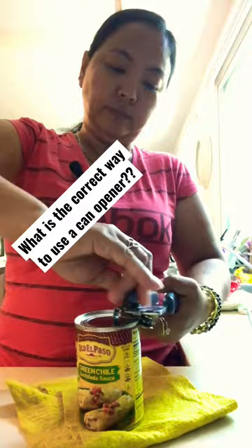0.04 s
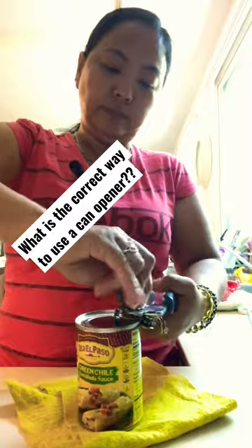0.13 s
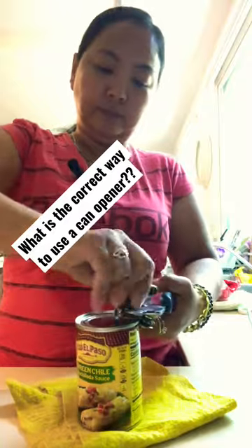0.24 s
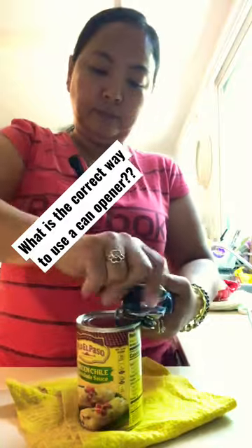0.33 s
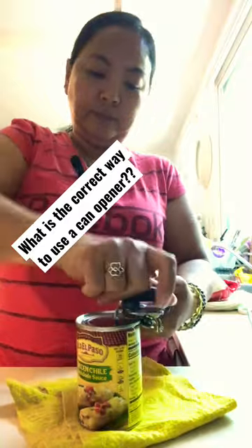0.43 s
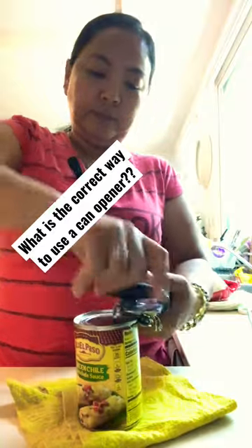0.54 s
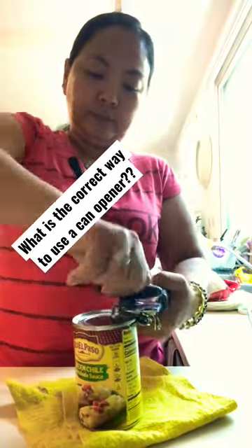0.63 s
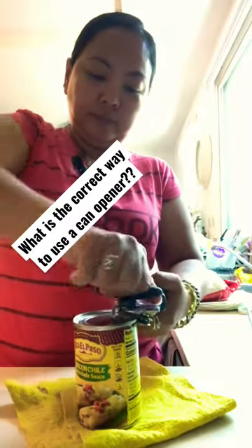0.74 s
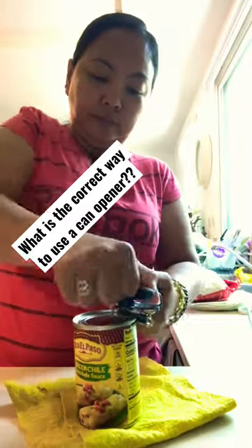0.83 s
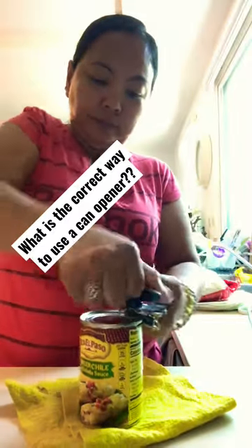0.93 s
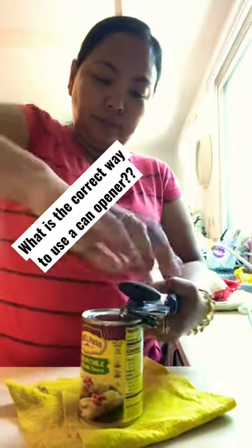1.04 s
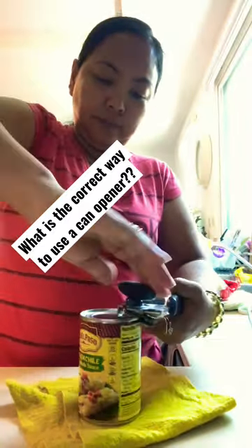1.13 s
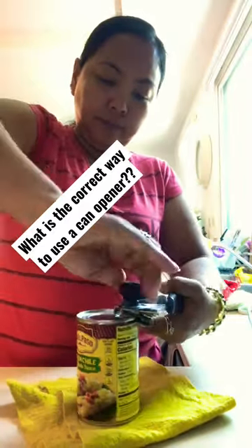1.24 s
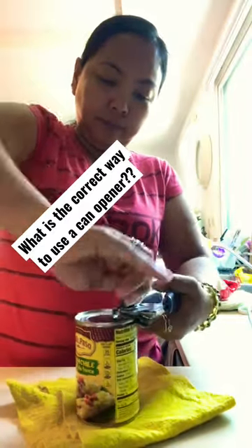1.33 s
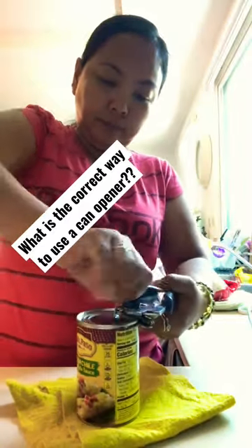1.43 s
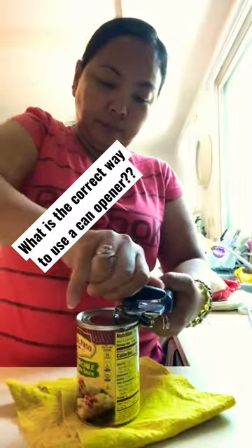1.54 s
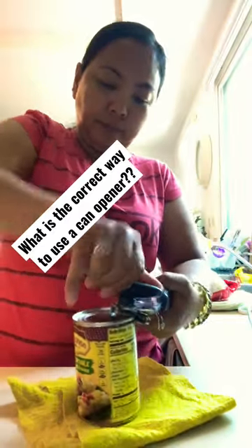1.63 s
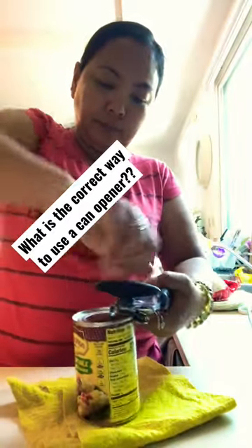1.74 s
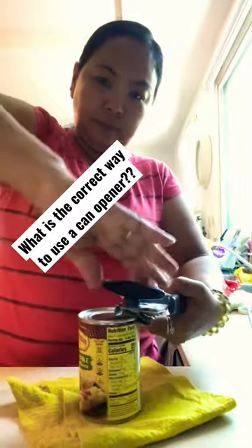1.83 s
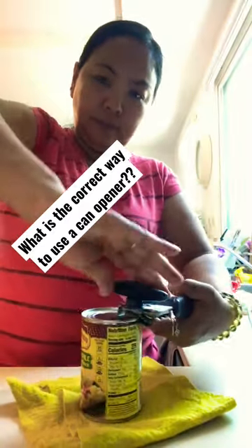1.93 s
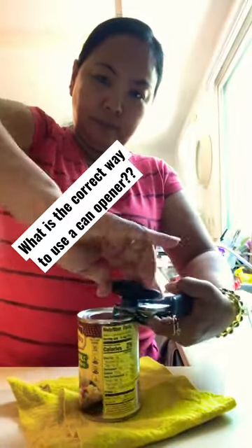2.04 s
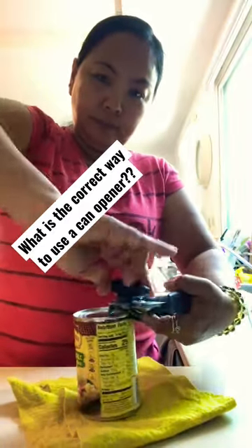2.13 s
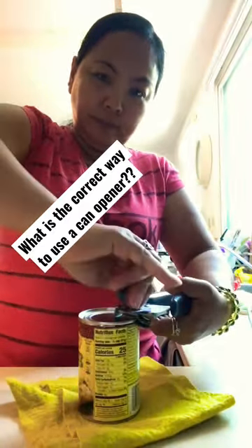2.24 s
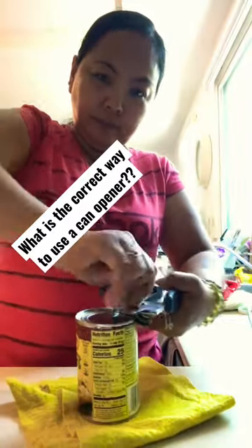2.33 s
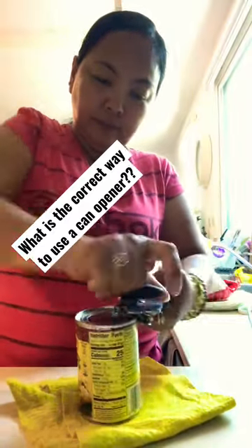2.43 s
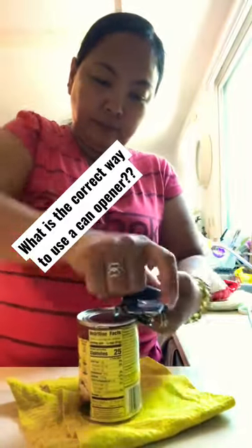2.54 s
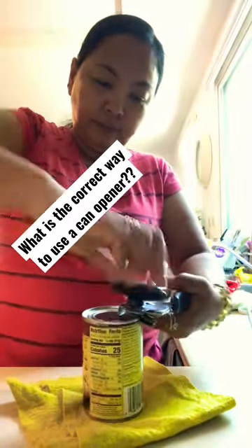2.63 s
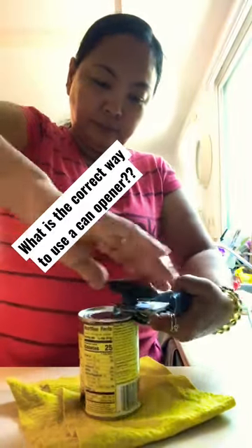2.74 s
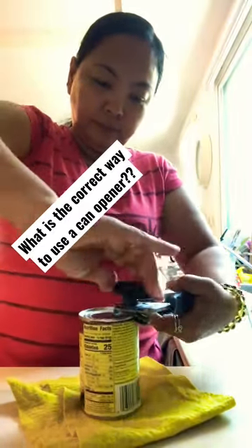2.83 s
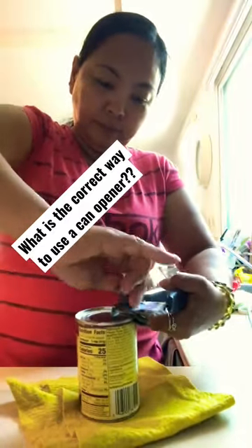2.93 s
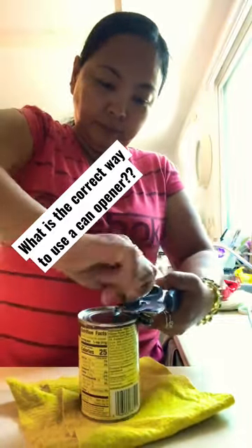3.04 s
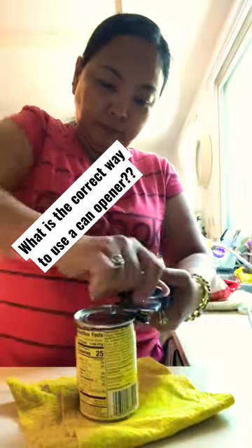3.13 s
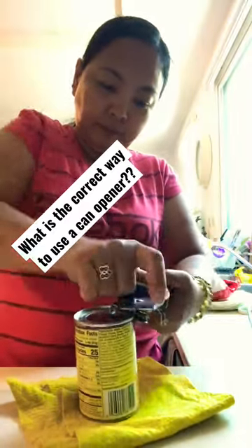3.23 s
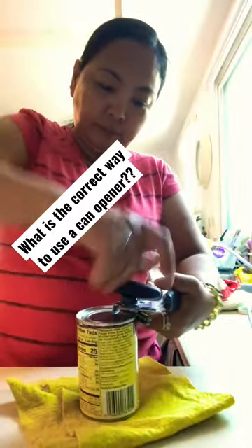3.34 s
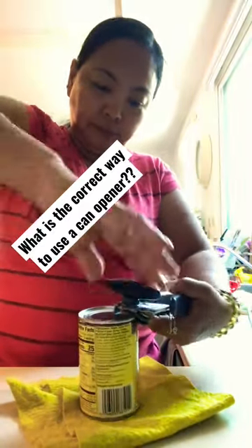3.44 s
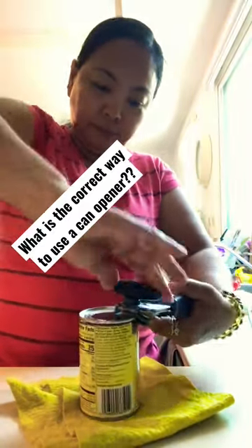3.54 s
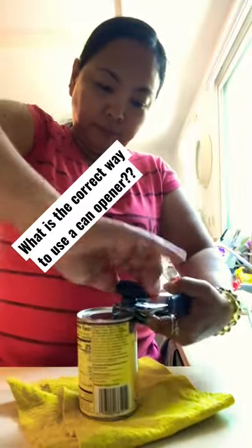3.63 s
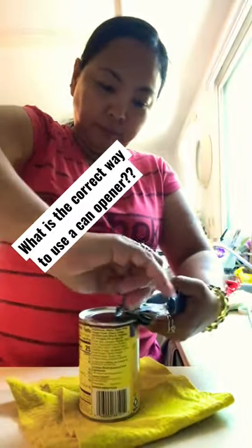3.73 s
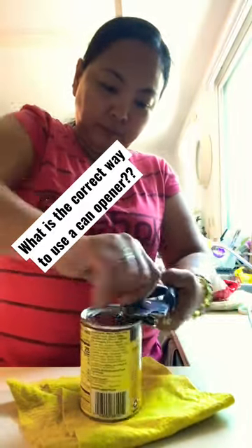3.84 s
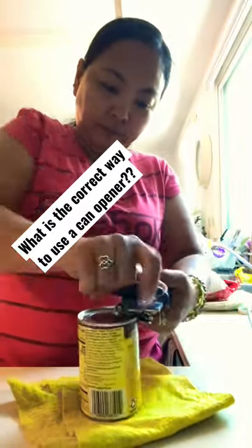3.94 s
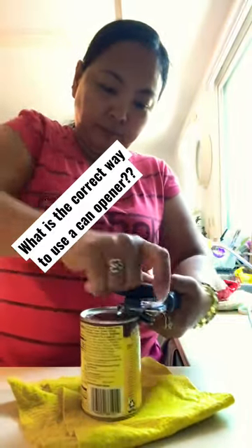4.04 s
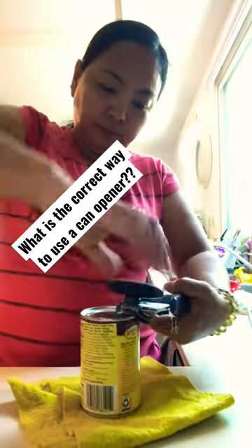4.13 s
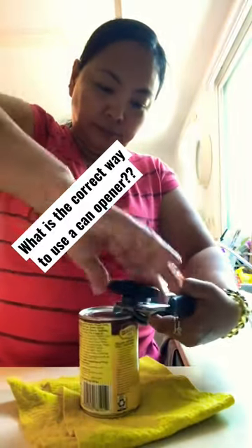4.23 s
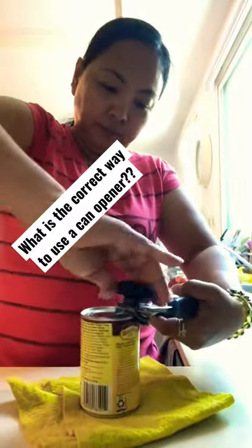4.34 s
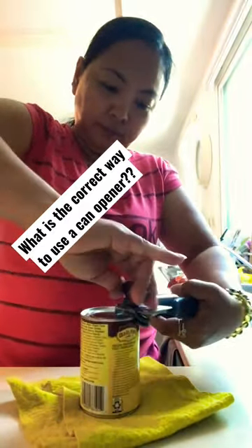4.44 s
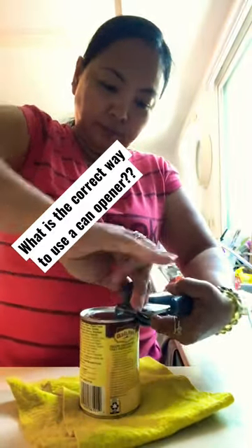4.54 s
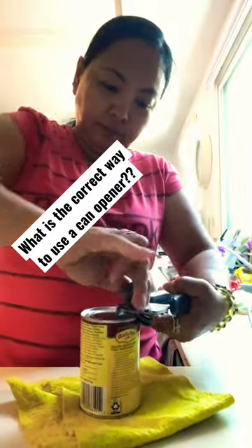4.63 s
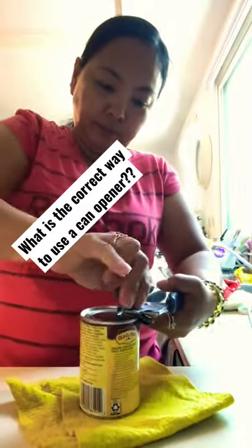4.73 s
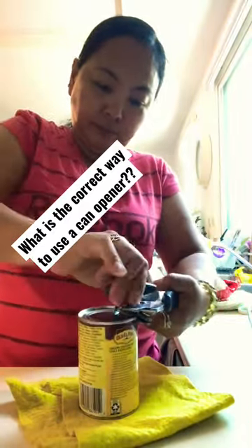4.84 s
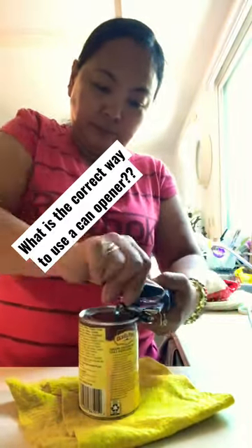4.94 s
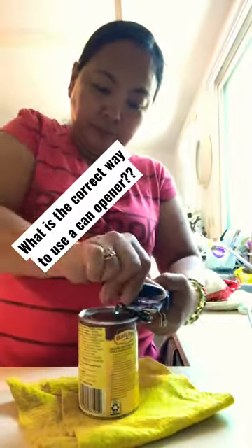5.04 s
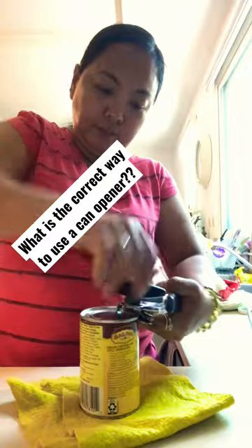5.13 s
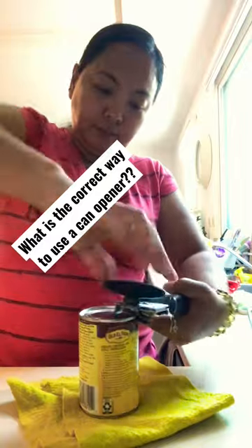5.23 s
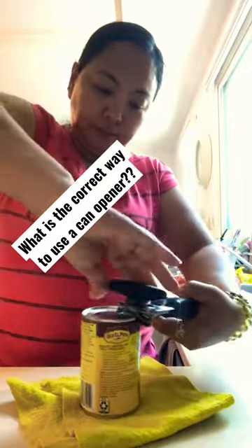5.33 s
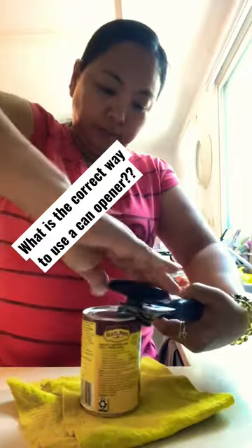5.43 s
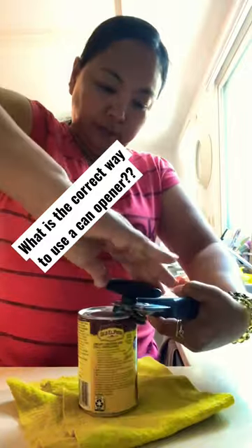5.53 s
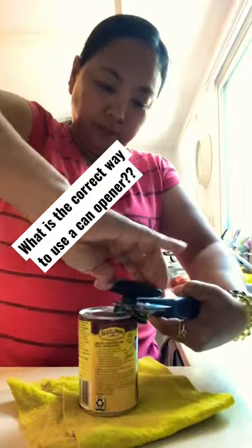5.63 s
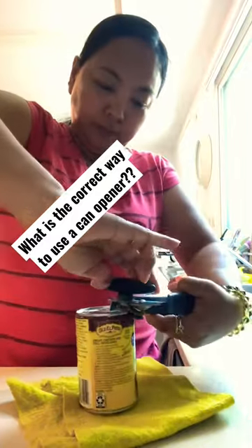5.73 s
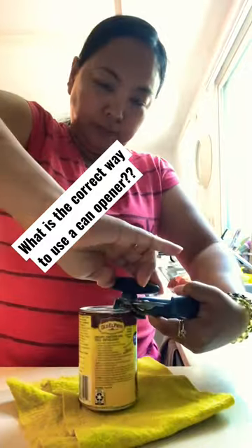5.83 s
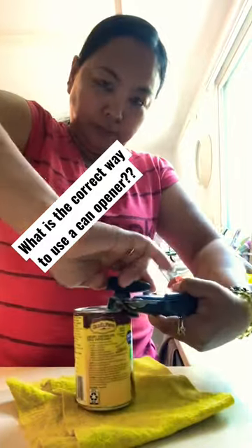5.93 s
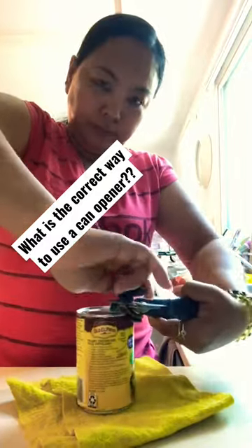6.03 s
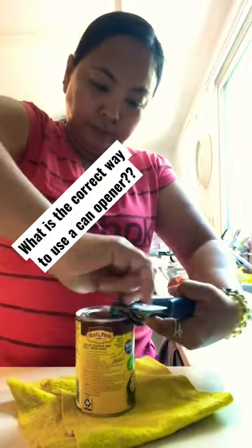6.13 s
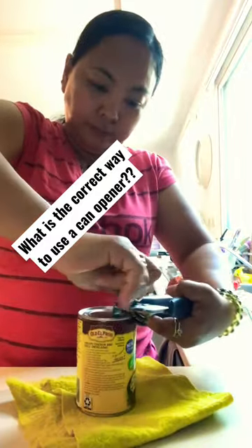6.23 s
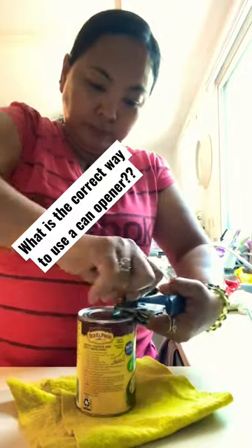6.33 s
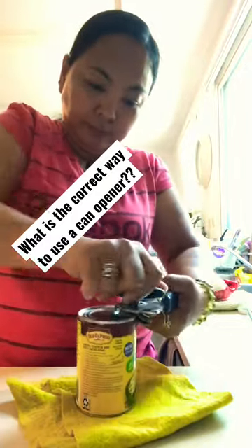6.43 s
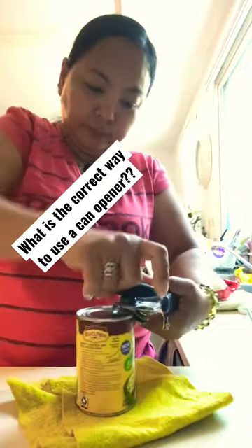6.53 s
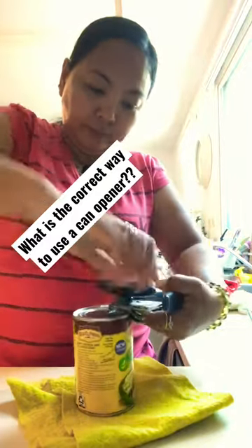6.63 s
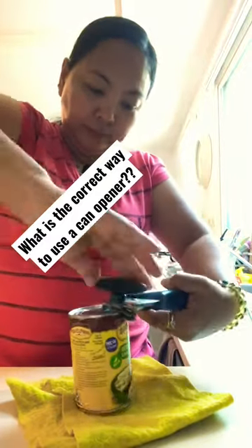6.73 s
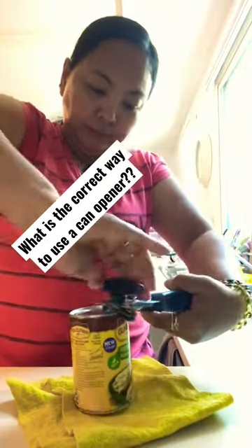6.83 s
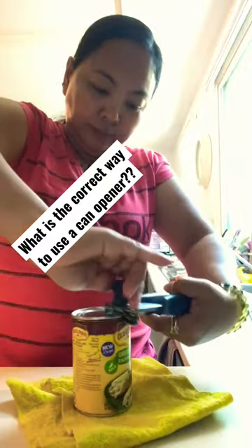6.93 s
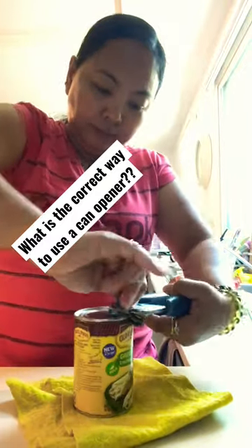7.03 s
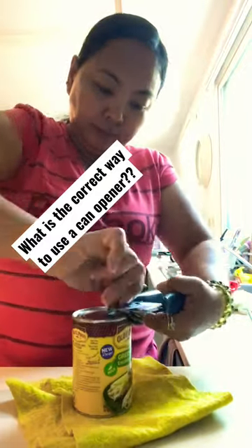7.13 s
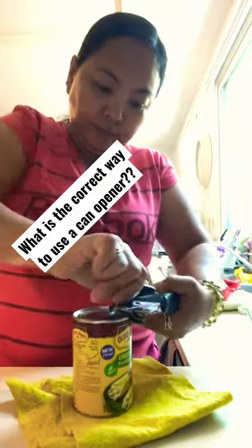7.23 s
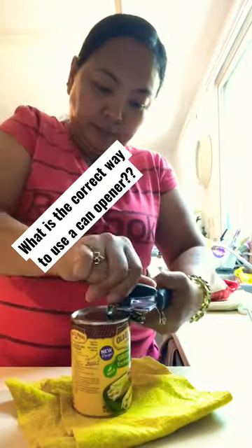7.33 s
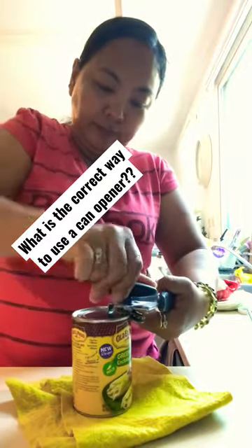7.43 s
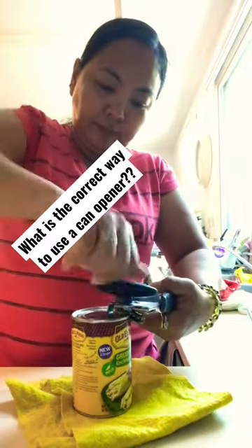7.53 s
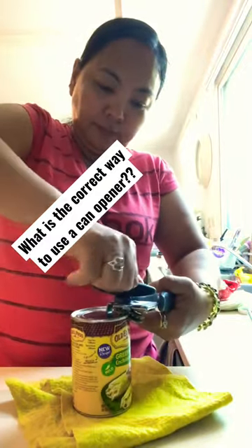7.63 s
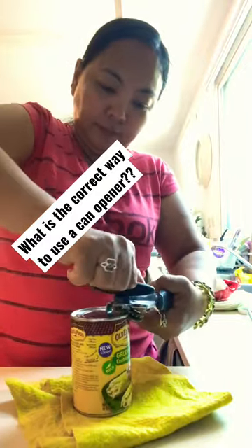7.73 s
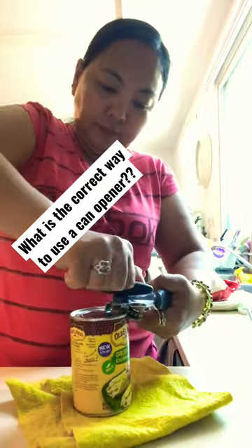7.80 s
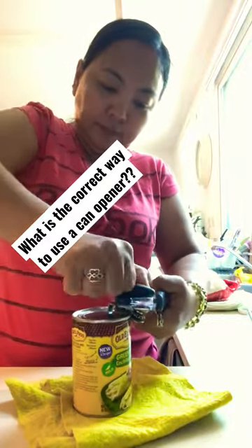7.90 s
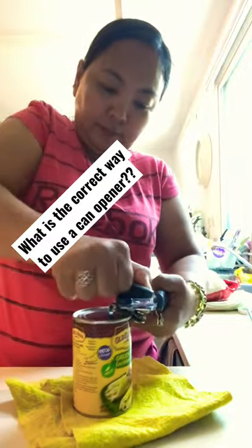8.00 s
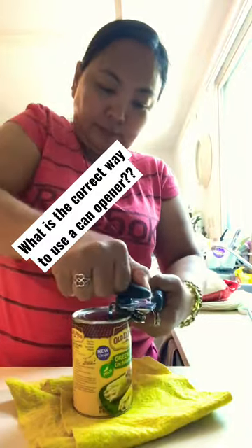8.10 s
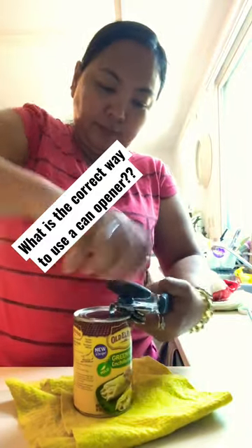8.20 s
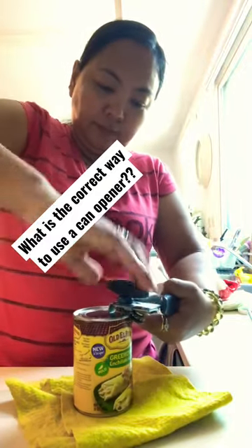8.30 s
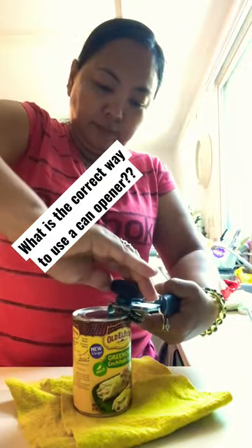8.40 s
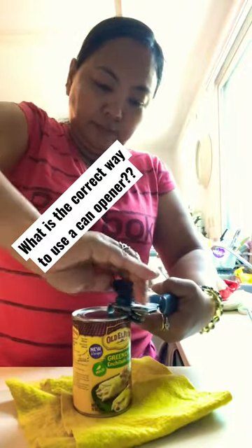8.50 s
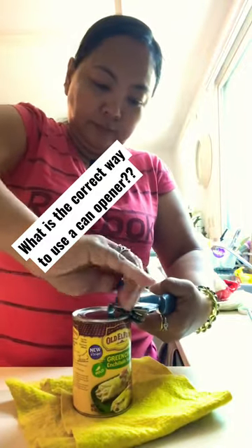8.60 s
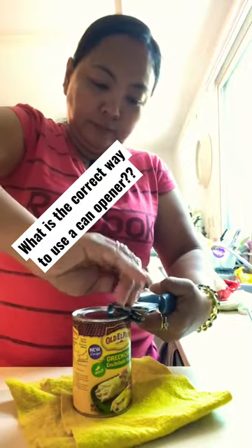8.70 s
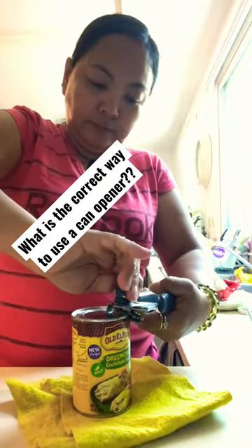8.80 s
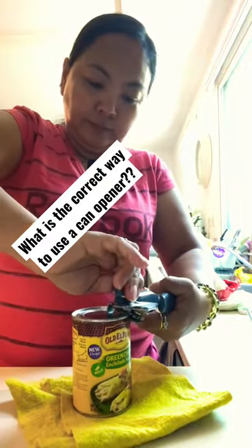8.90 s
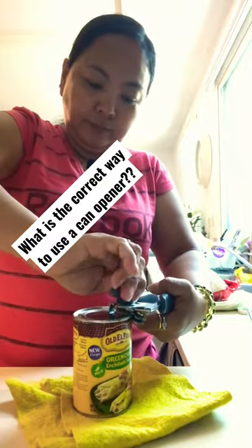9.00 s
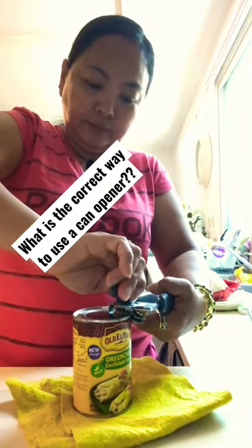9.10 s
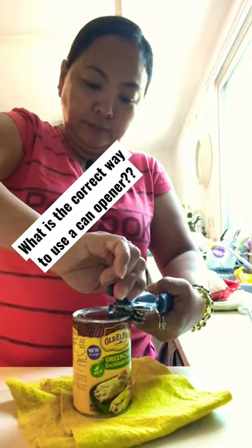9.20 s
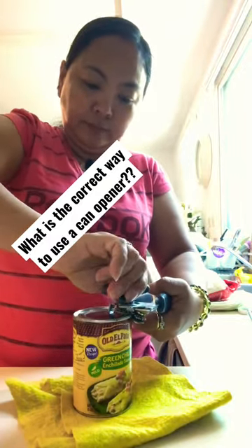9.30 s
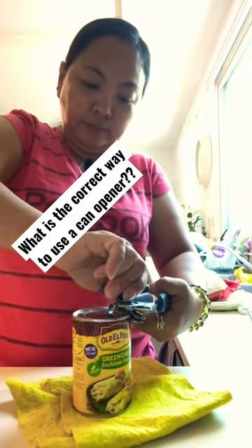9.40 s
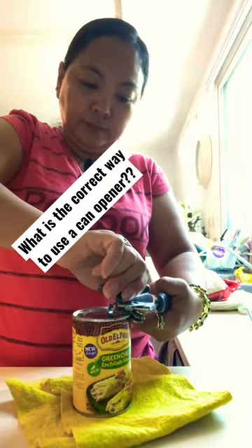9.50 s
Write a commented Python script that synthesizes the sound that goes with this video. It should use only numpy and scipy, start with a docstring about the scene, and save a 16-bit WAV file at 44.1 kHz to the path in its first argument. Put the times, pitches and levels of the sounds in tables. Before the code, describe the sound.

Clusters of metallic clicks, cracks and short scrapes come from a manual can opener working through a tin lid in a small kitchen.

```python
"""An appliance hums in a small kitchen as a hand can opener starts round a tin can. In each twist of the
key the wheel sticks and slips through the lid: lid, wall and steel jaws ring, and the can thumps on its
cloth. Just before 1 s a shirt brushes the microphone. The twists then come about every 0.75 s, and after
3 s the lid loosens. Past 5 s the hand takes a new grip: loose steel pings and the handle knocks.
The cutting starts again at 6 s and fades out around 9 s."""
import sys
import numpy as np
from scipy import signal
from scipy.fft import rfft, irfft, next_fast_len
from scipy.io import wavfile
from scipy.ndimage import uniform_filter1d

SR = 44100
rng = np.random.default_rng(int(sys.argv[2]) if len(sys.argv) > 2 else 0)


def wav_record(signal):
    """Record a signal, one row per channel, as 16-bit PCM in the file named by sys.argv[1]."""
    frames = np.transpose(np.atleast_2d(signal))
    bounded = np.clip(frames, -1, 1)
    # unit amplitude maps onto the largest positive 16-bit level
    quanta = np.round(bounded * 32767).astype(np.int16)
    wavfile.write(sys.argv[1], SR, quanta)


N = 421596
RING_TIME = np.arange(SR // 5) / SR   # the seconds over which one hit rings out
ATTACK = int(.012 * SR)   # the opening samples of a hit, which set its level
LID_LOOSENS_S = (3.2, 3.48)   # between these times the lid goes from stiff to half free
TOP_HZ = 10800   # the treble ends here; only two brief hisses go higher

# The lid's modes, the notes it rings at. A wider mode dies sooner.
# Each row: pitch in Hz, width in Hz, level in dB with the lid stiff, level in dB with it half free.
LID_MODES = [(1146.6, 41, -7, 0), (1265, 100, 3.5, 2.5), (1398, 17, -1, -11.5), (1584, 64, -2, -7.5),
             (1678, 7, -12, -11), (1810.8, 60, -17.5, 0), (1940, 72, -11.5, -5.5), (2177, 34, 1, -13)]
# The modes of the dragging blade. Each row: pitch in Hz, width in Hz, level in dB.
BLADE_MODES = [(2900, 600, 2), (4507, 540, 0), (5900, 792, -4.5), (8500, 1500, -26)]


def from_db(db):
    """Turn decibels into a number to multiply by."""
    return 10 ** (np.asarray(db) / 20)


def rms_one(x):
    """Scale a sound so that its average level (rms) is 1."""
    return x / np.sqrt(np.mean(x ** 2) + 1e-20)


def at_hz(points, hz):
    """Read between the rows of a table, with every octave equally wide."""
    row_hz, value = np.transpose(points)
    return np.interp(np.log(hz + 0.00069), np.log(row_hz), value)


def add(track, s, sound):
    """Mix a sound into the track, starting at s seconds."""
    start = max(round(s * SR), 0)
    part = sound[:max(N - start, 0)]
    track[start:start + len(part)] += part


def butter(x, hz, kind, order=2):
    """Keep the lows, the highs or a band; a higher order cuts more steeply."""
    return signal.sosfilt(signal.butter(order, hz, kind, fs=SR, output="sos"), x)


def noise(spectrum):
    """Steady noise at level 1, shaped by rows of frequency in Hz and level in dB."""
    size = next_fast_len(N)
    colour = from_db(at_hz(spectrum, np.arange(size // 2 + 1) * SR / size))
    return rms_one(irfft(rfft(rng.standard_normal(size)) * colour, size)[:N])


def contact(seconds, grit, spread_db, rise=0.079, snap_s=0.0072):
    """The force of one slip or hit: a shower of tiny slips. The shorter it is, the more it snaps."""
    seconds = max(seconds, 1e-4)
    grains, sizes = rng.standard_normal((2, len(RING_TIME)))
    envelope = np.exp(-RING_TIME / seconds) * (1 - np.exp(-RING_TIME / (rise * seconds)))
    force = grains * from_db(spread_db * sizes) * envelope
    force *= grit / np.sqrt(np.sum(force ** 2))
    force[0] += np.exp(-seconds / snap_s)
    return force + 1e-18


def friction(seconds, spread_db=5, catches_per_s=260, catch_db=4):
    """The force of a drag: uneven grains that bunch up where the surface catches."""
    t = np.arange(int(seconds * SR)) / SR
    grains, sizes, catches = rng.standard_normal((3, len(RING_TIME)))
    bunching = np.interp(t * catches_per_s, np.arange(len(catches)), catches)
    strength = from_db(spread_db * sizes[:len(t)] + catch_db * bunching)
    force = rms_one(grains[:len(t)] * strength * signal.windows.tukey(len(t)))
    return np.pad(force, (0, ATTACK)) + 1e-18


def body(force, modes, scatter_db=0, detune=0, damping=1):
    """A force rings an object's modes. Scatter and detune vary their levels and pitches at each touch."""
    out = 0
    for hz, width, db in modes:
        strength, shift = rng.standard_normal(2)
        decay = np.exp(-np.pi * width * damping / SR)
        angle = 2 * np.pi * hz * (1 + detune * shift) / SR
        ring = signal.lfilter([1, 0, -1], [1, -2 * decay * np.cos(angle), decay * decay], force)
        out = out + rng.choice([-1, 1]) * from_db(db + scatter_db * strength) * rms_one(ring)
    return out / np.sqrt(np.mean(out[:ATTACK] ** 2) + 1e-20)


def modes_at(table, s):
    """The modes at s seconds: as the lid loosens, some modes ring more and others less."""
    hz, width, stiff_db, free_db = np.transpose(table)
    freed = np.interp(s, LID_LOOSENS_S, [0, 1])
    return list(zip(hz, width, stiff_db + freed * (free_db - stiff_db)))


def air(level_db=-56):
    """The air of the room: a faint, low, steady rush."""
    # The tone of the air. Each row: frequency in Hz, relative level in dB.
    spectrum = [(30, -9), (60, 10), (110, -13.5), (160, -9), (280, -11), (450, -10), (700, -14),
                (1400, -16.5), (2100, -25.5), (3000, -28), (3800, -39), (6000, -39.5), (10000, -45.5),
                (16000, -54.5)]
    return from_db(level_db) * noise(spectrum)


def hum(waver_hz=.7):
    """An appliance motor hums a few slightly wavering tones."""
    # The motor's tones. Each row: pitch in Hz, level in dB.
    tones = [(150.4, -65.5), (299.5, -70), (528, -75), (753, -74.5)]
    out = 0
    for hz, db in tones:
        waver = waver_hz * noise([(1, -2.0), (4, -4.5), (12, -29.5), (50, -100)])
        out = out + from_db(db) * np.sqrt(2) * np.sin(2 * np.pi * np.cumsum(hz + waver) / SR)
    return out


def kitchen(x, first_s=0.0027, build_s=0.0013):
    """Echoes off the near walls thicken into a short tail that dies away band by band."""
    # How long the room rings. Each row: frequency in Hz, seconds to fade by 60 dB (0.15 at least is used).
    fade_times = [(150, 0.55), (500, 0.14), (1000, 0.36), (1750, 0.48), (3000, 0.3), (4500, 0.36),
                  (10000, 0.14)]
    # How strong its echo is. Each row: frequency in Hz, level in dB.
    echo_levels = [(150, 0), (500, -5), (1000, -13.5), (1750, -11), (4000, -15.5), (10000, -11)]
    t, echo = np.arange(SR * 3 // 4) / SR, 0
    build_up = 1 - np.exp(-np.maximum(t - first_s, 0) / build_s)
    edges_hz = np.geomspace(90, 14000, 11)
    for low, high in zip(edges_hz, edges_hz[1:]):
        hz = np.sqrt(low * high)
        fade_s = max(at_hz(fade_times, hz), .15)
        shape = build_up * np.exp(-np.log(1000) * t / fade_s)
        band = butter(rng.standard_normal(len(t)), [low, high], "band")
        echo = echo + from_db(at_hz(echo_levels, hz)) * band * shape / np.sqrt(np.sum(shape ** 2))
    return signal.fftconvolve(x, echo)[:N]


def swell(peak_s, peak_db, rise_db_per_s, fall_db_per_s):
    """The loudness of a stroke that grows to a peak and fades."""
    t = np.arange(N) / SR
    below_db = np.maximum(rise_db_per_s * (peak_s - t), fall_db_per_s * (t - peak_s))
    return from_db(peak_db - np.minimum(below_db, 200))


def shirt(relax_hz=850, pull_s=0.0015, pull_share=0.077):
    """A shirt rubs over the microphone and snags: a short pull, then a snap the other way."""
    # The cloth rubs. Each row: start in seconds, length in seconds, level in dB.
    rubs = [(0.748, 0.05, -62.5), (0.793, 0.0397, -46.5), (0.835, 0.01, -35)]
    # The cloth snags and lets go. Each row: time in seconds, strength in dB.
    snags = [(0.847, -3.5), (0.8676, -9), (0.8708, -4.5), (0.873, -8), (0.879, -19), (0.882, -10),
             (0.8823, -11), (0.887, -12.5), (0.8892, -17)]
    # The tone of its swish and of its rumble. Each row: frequency in Hz, relative level in dB.
    swish_spectrum = [(200, -10.5), (1400, 4.5), (3000, -12.5), (5000, -3), (7000, -14), (10000, -9),
                      (13000, -30)]
    rumble_spectrum = [(40, 4), (150, 9.5), (300, -13), (600, -3.5), (2000, -41.5)]
    pressure, snaps = np.zeros((2, N))
    for s, seconds, db in rubs:
        add(pressure, s, from_db(db) * np.abs(friction(seconds, spread_db=-6, catch_db=1)))
    pull = -pull_share * np.linspace(0, 1, int(pull_s * SR))
    snap = np.concatenate([pull, np.exp(-2 * np.pi * relax_hz * RING_TIME)])
    for s, db in snags:
        add(snaps, s - pull_s, from_db(db) * snap)
    swish = uniform_filter1d(pressure, size=24) * noise(swish_spectrum)
    stroke = swell(peak_s=.855, peak_db=-28, rise_db_per_s=720, fall_db_per_s=560)
    rumble = stroke * noise(rumble_spectrum)
    return butter(swish + rumble + butter(snaps, 7200, "low", order=3), 100, "high")


def thumps(rub_s=0.014, average_s=.07):
    """The can rocks on its cloth, which cushions each bump into a dull, scuffing thud."""
    # The can rocks. Each row: start in seconds, level in dB averaged over average_s.
    rocks = [(0.002, -48.5), (0.288, -52.5), (1.4, -46), (1.472, -51.5), (1.574, -48.5), (2.468, -44),
             (3.015, -43.5), (3.182, -44.5), (3.699, -43), (3.748, -46.5), (3.852, -44), (3.944, -51),
             (4.71, -47.5), (4.934, -47.5), (7.251, -51), (9.215, -54.5)]
    # The modes of the cushioned can. Each row: pitch in Hz, width in Hz, level in dB.
    cushioned_modes = [(151.7, 24, 7), (183.1, 41, -8.5), (222, 33, -9), (303, 550, -15.5)]
    out = np.zeros(N)
    for s, db in rocks:
        force = contact(rub_s, grit=2.1, spread_db=4)
        thud = butter(body(force, cushioned_modes, scatter_db=5.5), [130, 400], "band")
        add(out, s, from_db(db) * thud / np.sqrt(np.sum(thud ** 2) / (average_s * SR)))
    return out


def grip(creak_s=0.057):
    """Skin squeaks over the handle, and the handle knocks as the hand takes a new grip."""
    # The hand's squeaks. Each row: start in seconds, pitch in Hz, width in Hz, level in dB.
    creaks = [(1.8, 2230, 70, -55.5), (3.38, 1850, 350, -51.5), (5.229, 892, 140, -48.5),
              (5.379, 464, 43, -45.5), (5.386, 1500, 260, -39.5), (5.399, 990, 5.3, -41.5),
              (5.764, 1765, 200, -49.5), (7.375, 1350, 200, -49), (9.295, 696, 15.6, -55)]
    # The handle's hollow knocks. Each row: start in seconds, level in dB.
    knocks = [(5.479, -27.5), (5.517, -27)]
    # The handle's modes. Each row: pitch in Hz, width in Hz, level in dB.
    handle_modes = [(476, 32, -4), (769, 47, -0.5), (986, 92, -1.5), (1197, 110, -3), (1637, 90, 0),
                    (2620, 130, -9)]
    out = np.zeros(N)
    stroke = np.hanning(int(creak_s * SR))
    for s, hz, width_hz, db in creaks:
        rub = rms_one(body(rng.standard_normal(len(stroke)), [(hz, width_hz, 0)]))
        add(out, s, from_db(db) * stroke * rub)
    for s, db in knocks:
        add(out, s, from_db(db) * body(contact(0.0076, grit=1.6, spread_db=3), handle_modes))
    return butter(out, 2000, "low", order=4)


def pings(long_ring_db=-21, jingle_s=0.06, jingle_db=-17):
    """Loose steel is flicked: a thin ring, a rough clink and a short jingle."""
    # The flicks. Each row: start in seconds, ring level in dB, clink level in dB.
    flicks = [(3.154, -59, -43), (5.372, -31.5, -34.5), (5.841, -37, -55)]
    # The modes of the loose steel. Each row: pitch in Hz, width in Hz, level in dB.
    ring_modes = [(1643, 40, 1), (2680, 24, -3), (3660, 45, -11.5), (5340, 85, -0.5), (6750, 110, -9),
                  (8400, 61, -11.5), (9000, 64, -13), (9070, 50, -8)]
    clink_modes = [(2903, 200, -6.5), (5960, 460, -3.0), (9240, 410, 1.0)]
    out = np.zeros(N)
    for s, ring_db, clink_db in flicks:
        force = contact(0.0053, grit=1, spread_db=20)
        ring = body(force, ring_modes) + from_db(long_ring_db) * body(force, ring_modes, damping=.3)
        add(out, s, from_db(ring_db) * ring)
        add(out, s, from_db(clink_db) * body(contact(0.0051, grit=2.22, spread_db=0.5), clink_modes))
        rattle = friction(jingle_s, spread_db=8.5)
        jingle = body(rattle, ring_modes, scatter_db=2, detune=0.017, damping=3.4)
        add(out, s, from_db(ring_db + jingle_db) * rms_one(jingle))
    return out


def gears(tick_width_hz=260, catches_per_s=1400, spread_db=4):
    """The gear teeth tick now and then; in a hard twist their tiny catches blur into a grind."""
    # Light ticks of the teeth. Each row: start in seconds, level in dB, pitch in Hz.
    ticks = [(0.1898, -55, 5700), (0.385, -46.5, 7000), (1.299, -51, 4300), (3.193, -43, 5300),
             (3.774, -51, 5100), (3.921, -52.5, 5900), (6.2652, -38.5, 4400), (6.315, -55, 5700),
             (7.271, -48, 5160), (8.259, -71, 5530)]
    # Hard twists of the key. Each row: start in seconds, length in seconds, level in dB.
    twists = [(1.31, 0.23, -58), (2.182, 0.26, -60.5), (2.879, 0.35, -55), (3.708, 0.19, -54.5),
              (6.153, 0.32, -61.5), (6.92, 0.3, -66)]
    out = np.zeros(N)
    for s, db, hz in ticks:
        force = contact(0.0025, grit=2.1, spread_db=9)
        add(out, s, from_db(db) * body(force, [(hz, tick_width_hz, 0), (hz, 3000, -2)]))
    for s, seconds, db in twists:
        count = int(seconds * SR)
        chance, sizes = rng.random(SR)[:count], rng.standard_normal(SR)[:count]
        catches = (chance < catches_per_s / SR) * from_db(spread_db * sizes)
        force = np.pad(catches * signal.windows.tukey(count), (0, ATTACK)) + 1e-18
        add(out, s, from_db(db) * rms_one(body(force, BLADE_MODES, detune=.05)))
    return butter(out, [2000, 8000], "band")


def scrapes():
    """The blade drags along the rim between slips; held by the wheel, the lid rings only briefly."""
    # The drags. Each row: start in seconds, length in seconds, relative lid and steel levels in dB.
    drags = [(2.183, 0.059, -49, -38.5), (2.449, 0.028, -42, -54), (3.665, 0.0094, -38, -45.5),
             (3.735, 0.09, -38, -48), (4.699, 0.011, -36.5, -42.5), (6.126, 0.013, -29, -29.5),
             (6.266, 0.074, -38.5, -50.5), (6.381, 0.0189, -32, -47), (7.01, 0.011, -34.5, -46),
             (7.115, 0.036, -33.5, -46)]
    lid, steel = np.zeros((2, N))
    for s, seconds, lid_db, steel_db in drags:
        force = friction(seconds)
        lid_ring = body(force, modes_at(LID_MODES, s), scatter_db=4, damping=4.4)
        blade_ring = body(force, BLADE_MODES, scatter_db=6.5, detune=.04)
        add(lid, s, from_db(lid_db - 1.5) * rms_one(lid_ring))
        add(steel, s, from_db(steel_db - 6.5) * rms_one(blade_ring))
    return butter(lid, [650, 2700], "band") + butter(steel, [1800, 6800], "band", order=3)


def hollow(level_db=-6, width_hz=32, knock_width_hz=130):
    """A slip jolts the whole can, which answers with a short hollow note."""
    # The jolts. Each row: start in seconds, relative level in dB, pitch in Hz.
    jolts = [(0.081, -34.5, 676), (1.474, -35.5, 442), (2.224, -35.5, 595), (2.422, -34.5, 446),
             (2.913, -37.5, 466), (3.7, -32, 557), (4.549, -34, 516), (4.714, -37, 440), (5.991, -27, 632),
             (6.138, -45, 568), (7.874, -37.5, 437), (8.506, -29.5, 563), (8.642, -38.5, 528)]
    out = np.zeros(N)
    for s, db, hz in jolts:
        force = contact(0.00094, grit=0.22, spread_db=4.5)
        add(out, s, from_db(db + level_db) * body(force, [(hz, width_hz, 0), (hz, knock_width_hz, -2)]))
    return butter(out, [250, 750], "band")


def high_hiss(hiss_s=0.0022):
    """A brief, very high hiss on two loud cracks."""
    # The hisses. Each row: start in seconds, level in dB.
    hisses = [(3.702, -60), (8.5079, -52)]
    out = np.zeros(N)
    for s, db in hisses:
        add(out, s, from_db(db) * body(contact(hiss_s, grit=3, spread_db=5), [(13100, 4000, 0)]))
    return butter(out, TOP_HZ, "high", order=4)


def cracks(width_hz=420):
    """The tin gives way with a sharp crack: a hard, high knock of the blade."""
    # The cracks. Each row: start in seconds, level in dB, pitch in Hz.
    tears = [(2.172, -24, 4520), (3.0192, -40, 5460), (3.702, -24.5, 4184), (4.458, -39.5, 4432),
             (5.993, -30.5, 5030), (6.141, -34, 8430), (6.4745, -49, 4660), (6.9047, -33, 4440),
             (7.354, -49.5, 4070), (8.5079, -37, 4540)]
    out = np.zeros(N)
    for s, db, hz in tears:
        force = contact(0.0018, grit=1.9, spread_db=0.5)
        add(out, s, from_db(db) * body(force, [(hz, width_hz, 0), (8700, 2500, -20)]))
    return butter(out, [2500, 9000], "band")


def singing(fade_s=.41, split_hz=22, swell_s=.004, count=5):
    """The lid springs free and sings on; its ragged edge splits each mode into close tones that beat."""
    # The two singing modes: the lid's, except in the first row, where the steel jaws ring on. Each row: start
    # in seconds, then pitch in Hz and level in dB # for the low mode, then the same for the high mode.
    notes = [(0.079, 1413, -53, 2924, -58), (1.3209, 1670, -44, 2930, -55),
             (1.4742, 1600, -42.5, 2186, -38), (2.312, 1580, -53, 2226, -47),
             (2.422, 1593, -42.5, 2810, -52), (3.0187, 1552, -31.5, 2860, -40),
             (3.1775, 1498, -38.5, 2220, -46.5), (4.7145, 1910, -45.5, 3120, -46),
             (6.1393, 1815, -32, 2850, -44), (7.874, 1786, -41, 3337, -45.5),
             (8.5066, 1766, -37.5, 2860, -48.5)]
    out, t = np.zeros(N), np.arange(SR * 3 // 5) / SR
    envelope = (1 - np.exp(-t / swell_s)) * np.exp(-np.log(1000) * t / fade_s)
    for s, low_hz, low_db, high_hz, high_db in notes:
        for hz, db in (low_hz, low_db), (high_hz, high_db):
            tones_hz = hz + split_hz * rng.standard_normal((count, 1))
            tones = np.sin(2 * np.pi * (tones_hz * t + rng.random((count, 1)))).sum(axis=0)
            add(out, s, from_db(db) * rms_one(envelope * tones) * np.sqrt(np.mean(envelope ** 2)))
    return out


def crumble(ticks_per_s=350, dying_s=0.0068, level_db=-11):
    """The torn edge goes on crumbling in tiny ticks after a slip."""
    chance, sizes = rng.random(len(RING_TIME)), rng.standard_normal(len(RING_TIME))
    ticks = (chance < ticks_per_s / SR) * sizes * np.exp(-RING_TIME / dying_s)
    ticks[0] = 1
    return from_db(level_db) * body(ticks + 1e-18, [(2670, 490, 0.022), (5040, 240, 0.00021)])


def wall_ring(force, s, knock_width_hz=190):
    """The can's wall rings with one leading note and a knock that the contents deaden."""
    # The wall's modes. Each row: pitch in Hz, width in Hz, levels in dB with the lid stiff and half free.
    wall_modes = [(461, 8.7, -7.5, -15.5), (517, 23, -18.5, -19), (735, 50, -5, -7.5),
                  (798.3, 38, 3.5, 1.5), (900, 71, -13, -4.5), (982, 34, -2.5, -4)]
    # The leading note shifts as the can turns. Each row: time in seconds, pitch in Hz.
    lead_pitches = [(.4, 906), (1.45, 996), (2.19, 1046), (2.23, 805), (3.05, 778), (3.2, 1020),
                    (3.82, 993), (3.95, 743), (4.55, 686), (4.7, 985), (6, 814), (7, 1001), (9, 889)]
    hz = np.interp(s, *np.transpose(lead_pitches))
    lead, knock = (hz, 30, 3.5), (hz, knock_width_hz, 5)
    return body(force, modes_at(wall_modes, s) + [lead, knock], scatter_db=2, detune=0.0035)


def lid_ring(force, s, hz, louder_db, sing_db=-18):
    """The lid rings and its leading note lingers. Loud slips knock more; gentle ones ring purer."""
    lead, knock = (hz, 48, 8), (hz, 80, 6 + 0.33 * louder_db)
    ring = body(force, modes_at(LID_MODES, s) + [lead, knock], scatter_db=2, detune=0.0035)
    return ring + from_db(sing_db) * body(force, [(hz, 11, 0)])


def jaw_ring(jolt, s, bites, sing_db=-15.5):
    """The steel jaws ring, a little differently as the grip shifts. In a bite they ring high and short."""
    hz, width_hz = (4750, 670) if bites else (np.interp(s, LID_LOOSENS_S, (2856, 3055)), 75)
    # The jaws' modes. Each row: pitch in Hz, width in Hz, levels in dB with the lid stiff and half free.
    jaw_modes = [(2274, 44, 1.5, 7), (2660, 360, 8.5, 0.5), (2863, 220, 10.5, 4), (3353, 59, 2, 1.5),
                 (3850, 340, 1, -4.5), (4200, 260, 3, 1), (5190, 230, 1.5, -0.5), (5950, 250, 3, 0.5),
                 (6380, 86, -9, -8.5), (6570, 270, -16.5, -16), (8710, 420, -19.5, -13.5),
                 (9870, 120, -14.5, -12.5), (4560, 610, -7.5, -7)]
    lead, knock = (hz, width_hz, 7), (hz, 240, 2.5)
    ring = body(jolt, modes_at(jaw_modes, s) + [lead, knock], scatter_db=2, detune=0.016)
    sing_hz = np.interp(s, LID_LOOSENS_S, (2860, 3210))
    return ring + from_db(sing_db) * body(jolt, [(sing_hz, 16, 0)], detune=.012), hz


def slips(pause_s=.7, bite_db=-7, stutter_chance=.9, stutter_s=(.012, 0.047), stutter_db=-17):
    """List the wheel's slips. A hard one after a pause is a bite; most have a weaker one just after."""
    # The wheel slips. Each row: start in seconds, lid level in dB, wall and steel levels in dB
    # compared with the lid, lid pitch in Hz.
    wheel_slips = [(.002, -44.5, 0, -9, 2080), (0.0796, -44, -19, -11, 1407), (0.1874, -49, -2, -2, 1450),
                   (0.287, -51, -3, -5.5, 1237), (0.3831, -40.5, -3.5, -6, 1204),
                   (1.3205, -30, -6, -7, 1680), (1.402, -32, -0.5, -2, 1670), (1.4441, -36, -3, -12, 1066),
                   (1.4738, -25, -0.5, -7, 2134), (1.5711, -40, -7, -13, 2240),
                   (1.643, -51.5, -25, -27, 2190), (2.172, -28, -6, -2, 1237),
                   (2.1931, -32, -0.5, -22, 1057), (2.2254, -31, -3, -8, 1097), (2.274, -44.5, 4, 1, 1400),
                   (2.312, -36, 1, -7.5, 2140), (2.362, -28.5, -4.5, -10.5, 1220),
                   (2.4222, -21.5, -7.5, -10, 1307), (2.4723, -31.5, -22, -9.5, 1362),
                   (2.914, -24.5, -7.5, -17, 1592), (2.9586, -28.5, -5, -12, 1514),
                   (3.0113, -34, -3, -8, 1550), (3.0186, -13, -12, -10.5, 1598),
                   (3.087, -34.5, -4.5, -8.5, 1622), (3.177, -19, -11.5, -15.5, 1325),
                   (3.6689, -31, -7, -24, 1320), (3.702, -11.5, -7.5, -16.5, 1624),
                   (3.7442, -14.5, -1.5, -19, 1140), (3.8443, -24, 3.5, -17, 1025),
                   (3.889, -26, 0.5, -14.5, 1740), (4.3965, -32.5, -7.5, -10, 1746),
                   (4.4389, -33, -6.5, 2.5, 1800), (4.4567, -32, -2.5, -6, 1810),
                   (4.5316, -37.5, -33, 2, 1770), (4.5483, -29, -4, -9.5, 1870),
                   (4.7053, -31.5, -15, -7, 1740), (4.714, -19, -14, -9.5, 1820),
                   (4.9174, -28.5, -32, -14.5, 1265), (4.9432, -37.5, -7, -7, 1805),
                   (5.9933, -24, -2.5, -2.5, 1701), (6.13, -32, 1, -9, 1900),
                   (6.1404, -10, -21.5, -15, 1792), (6.1504, -22, -12.5, -9.5, 1813),
                   (6.2649, -31, -13, -12, 1865), (6.292, -30.5, -14, -29, 1860),
                   (6.367, -27.5, -7, -24, 1140), (6.4271, -23.5, -12, -12, 1179),
                   (6.904, -27, -7, -9.5, 1680), (6.937, -28, -9.5, -1.5, 1585),
                   (6.9521, -25, -16, -14.5, 1147), (7.016, -27, -9.5, -12, 1715),
                   (7.0274, -22.5, -9.5, -9, 1835), (7.125, -28.5, -33, -18, 1092),
                   (7.1488, -29.5, -14, -21, 1135), (7.2065, -38, -13, -23, 1370),
                   (7.256, -22.5, -3.5, -10.5, 1362), (7.2904, -30.5, -14, -12, 1195),
                   (7.852, -26, -11, -1.5, 1727), (7.874, -20, -19.5, -11.5, 1762),
                   (8.033, -28.5, -7, -8, 1710), (8.053, -35, -21.5, -11, 1850),
                   (8.122, -41, -36, -17, 1672), (8.247, -34.5, -22, -19, 1134),
                   (8.258, -37, -17.5, -17, 1645), (8.5071, -19, -7.5, -11.5, 1788),
                   (8.5388, -31.5, -26, -11.5, 1730), (8.64, -31, -6, -15.5, 1793),
                   (8.9555, -35.5, -10.5, -31.5, 1751), (8.996, -46, -19, -17, 1780),
                   (9.1395, -48, -24.5, -27, 1350), (9.2114, -39.5, -27, -22, 1696),
                   (9.26, -46, -34, -32, 1790)]
    previous_s = 0
    dice = rng.random((len(wheel_slips), 2))
    for (s, db, wall_db, steel_db, hz), (chance, delay) in zip(wheel_slips, dice):
        bites = s - previous_s > pause_s and steel_db > bite_db
        yield s, db, wall_db, steel_db, hz, bites
        if chance < stutter_chance:
            yield s + np.interp(delay, [0, 1], stutter_s), db + stutter_db, wall_db, steel_db, hz, False
        previous_s = s


def cutting(creep_s=0.021, creep_db=-26, typical_s=0.0047, typical_db=-30, typical_steel_db=-12):
    """The wheel creeps under growing strain, then slips and rings the wall, lid and jaws."""
    wall, lid, steel, creep = np.zeros((4, N))
    strain = np.linspace(0, 1, int(creep_s * SR)) ** 2
    for s, db, wall_db, steel_db, lid_hz, bites in slips():
        # loud, hard slips are over at once; weak, soft ones grind on
        louder_db, harder_db = db - typical_db, steel_db - typical_steel_db
        grind_s = typical_s * .5 ** (louder_db / 14.5 + harder_db / 31)
        jolt = contact(grind_s, grit=1, spread_db=2)   # the jaws feel the slip at once
        crunch = contact(0.69 * grind_s, grit=2.2, spread_db=2.5, rise=0.55)   # the tin gives way
        add(wall, s, from_db(db + wall_db) * wall_ring(crunch, s))
        add(lid, s, from_db(db) * lid_ring(crunch, s, lid_hz, louder_db))
        jaws, jaw_hz = jaw_ring(jolt, s, bites)
        treble_hz = np.interp(steel_db, [-24, -6], [3000, 13000])   # soft slips sound dull
        add(steel, s, from_db(db + steel_db) * butter(jaws + crumble(), treble_hz, "low", order=1))
        rasp = body(rng.standard_normal(len(strain)), [(lid_hz, 600, 0), (jaw_hz, 2500, steel_db - 2.5)])
        add(creep, s - creep_s, from_db(db + creep_db) * strain * rasp)
    tin = butter(wall, [300, 1700], "band", order=3) + butter(lid, [650, 2350], "band", order=4)
    return tin + butter(steel, 2100, "high") + butter(creep, [700, 6000], "band")


def soften_top(x):
    """Round off the peaks and cut the treble above 10.8 kHz."""
    rounded = .95 * np.tanh(x / .95)
    return signal.sosfilt(signal.ellip(10, .3, 80, TOP_HZ, fs=SR, output="sos"), rounded)


def scene(shirt_echo_db=-11):
    """Mix opener and shirt with their echo, then the thumps, hum and air, into one channel."""
    knock, hiss = cracks(), high_hiss()
    opener = cutting() + singing() + gears() + scrapes() + hollow() + knock + pings() + grip()
    cloth = shirt()
    echo = kitchen(opener + from_db(shirt_echo_db) * cloth)
    sound = opener + cloth + echo + thumps() + hum() + air()
    return (soften_top(sound) + hiss)[None]


def record(dry, low_hz=146, high_hz=16300):
    """Steep filters take away the deep rumble and the very top."""
    no_rumble = signal.sosfilt(signal.ellip(5, .3, 27, low_hz, "high", fs=SR, output="sos"), dry)
    return signal.sosfilt(signal.ellip(8, .3, 60, high_hz, fs=SR, output="sos"), no_rumble)


dry = scene()
out = record(dry)
wav_record(out)
```